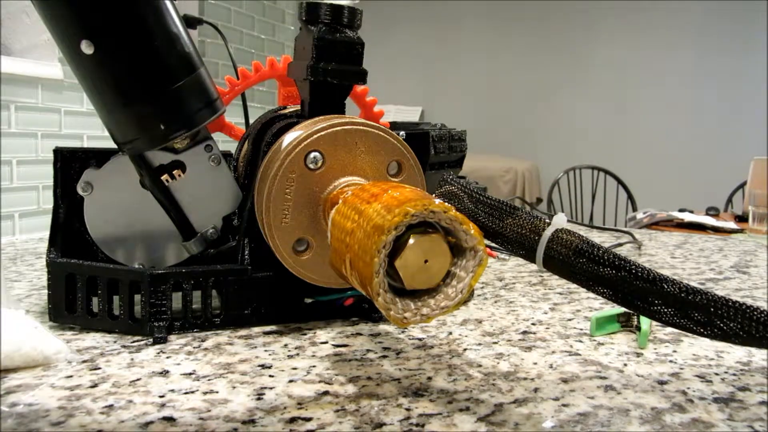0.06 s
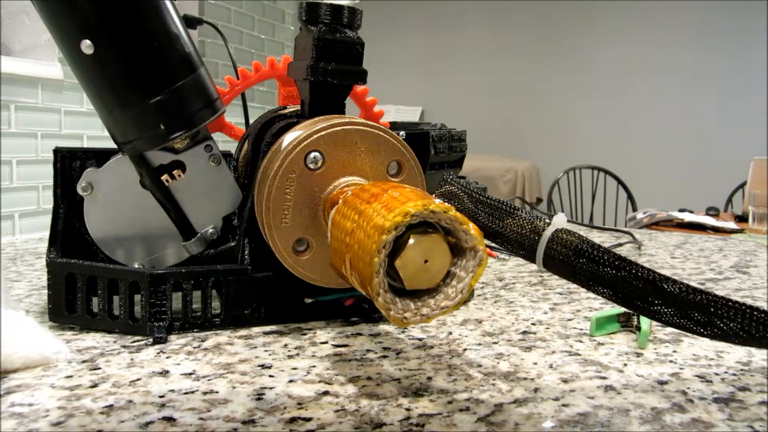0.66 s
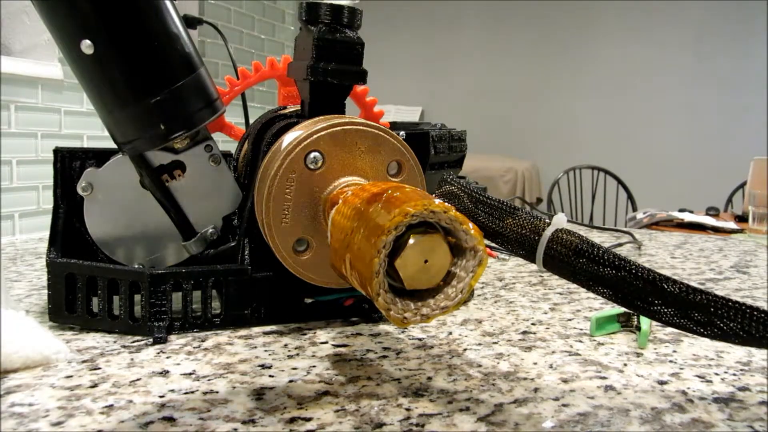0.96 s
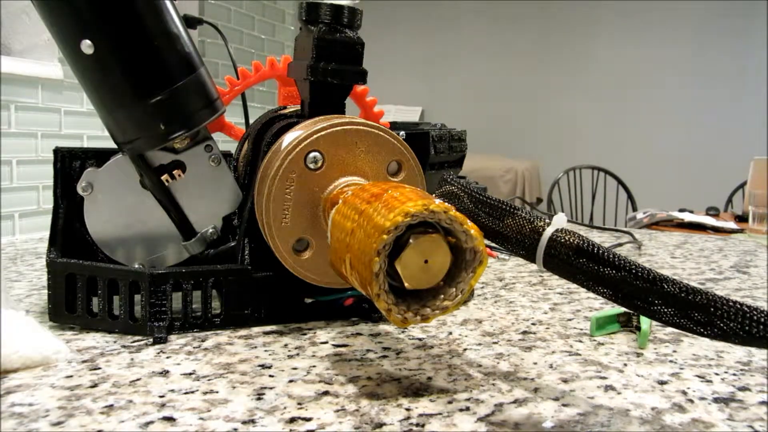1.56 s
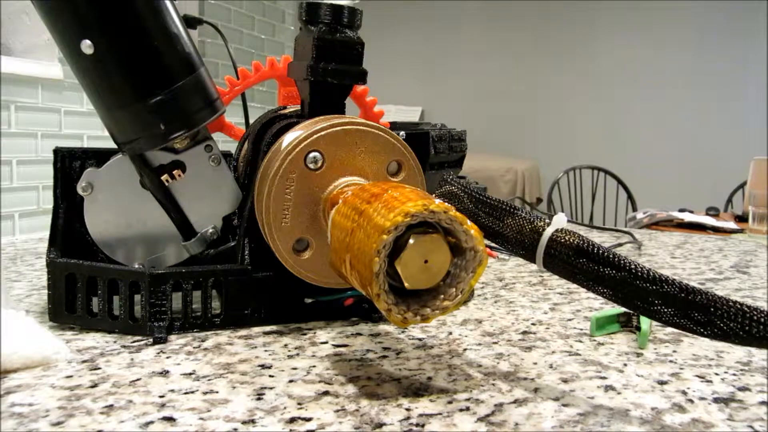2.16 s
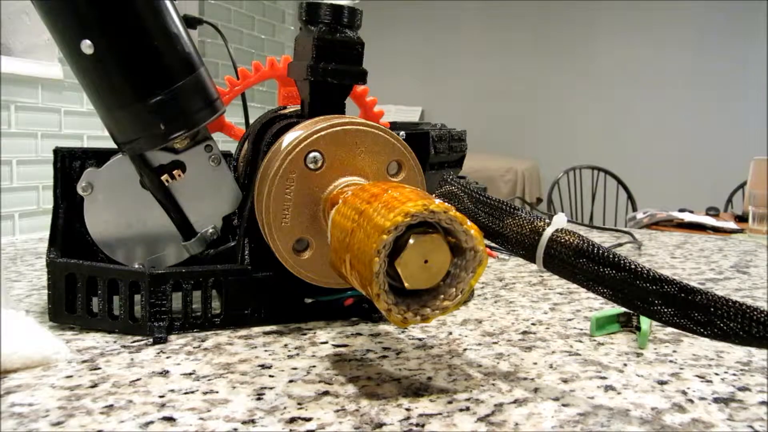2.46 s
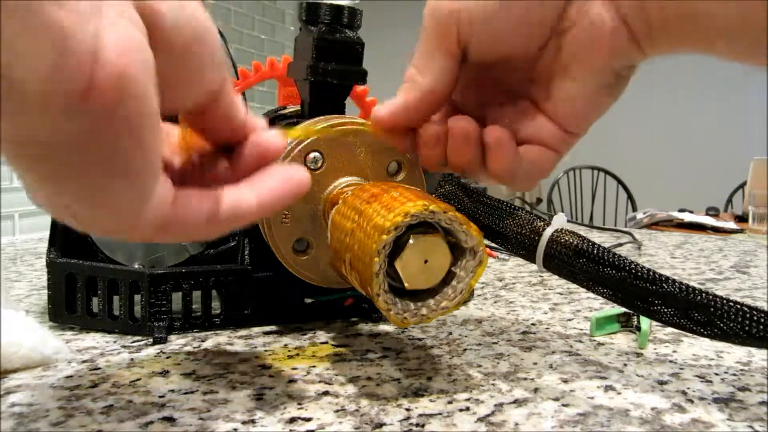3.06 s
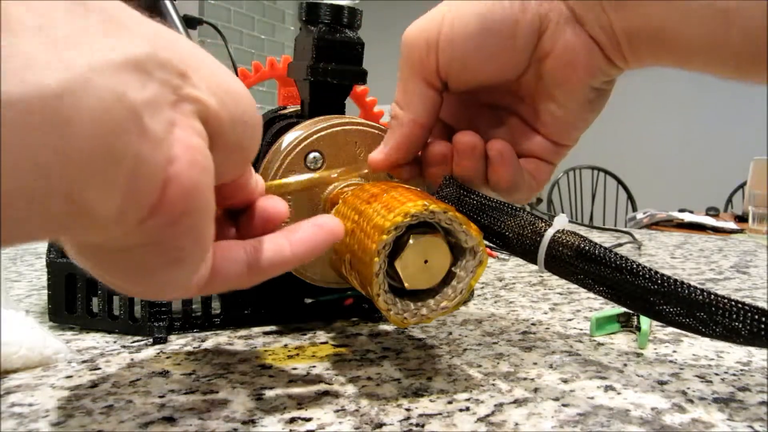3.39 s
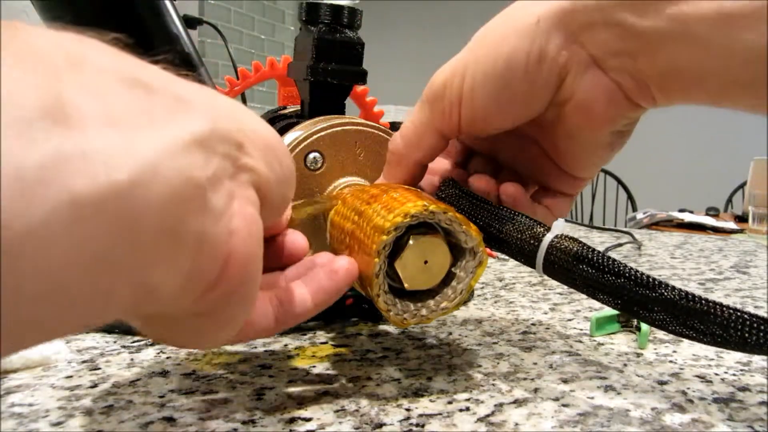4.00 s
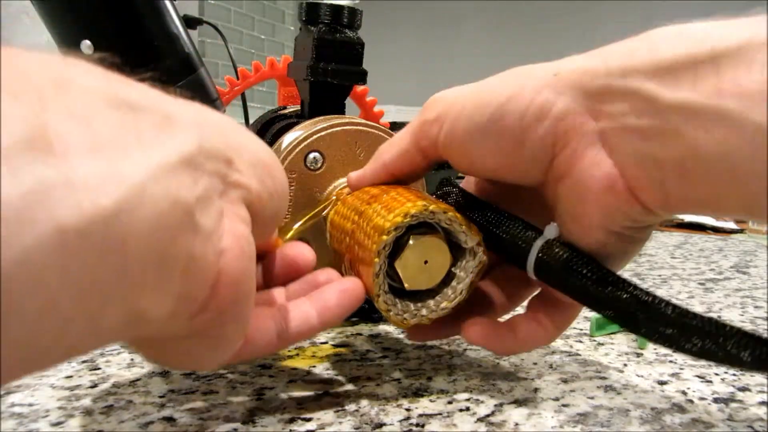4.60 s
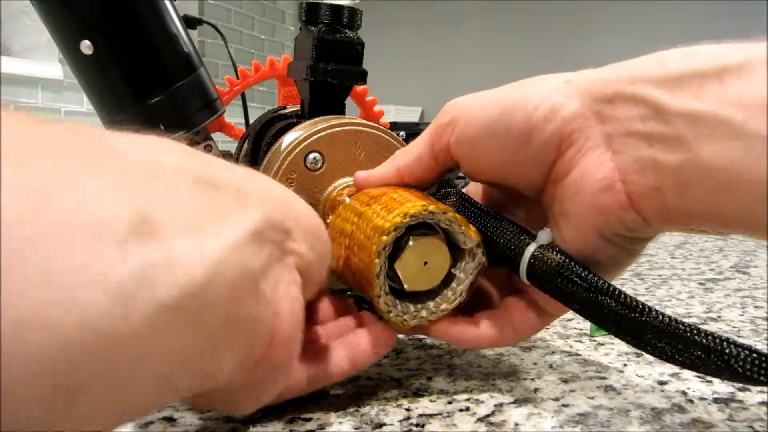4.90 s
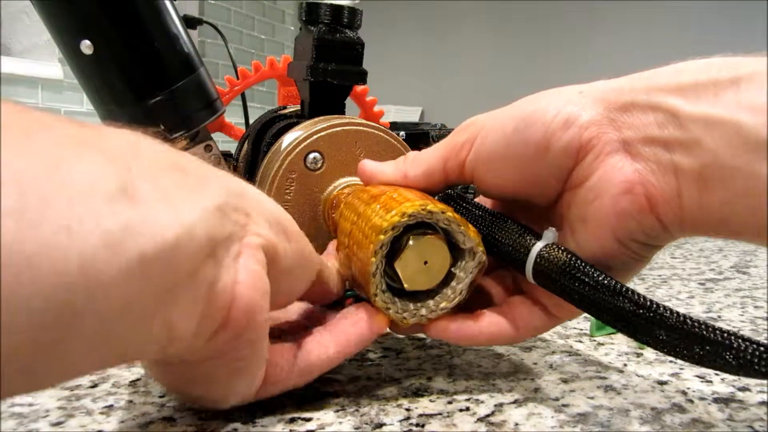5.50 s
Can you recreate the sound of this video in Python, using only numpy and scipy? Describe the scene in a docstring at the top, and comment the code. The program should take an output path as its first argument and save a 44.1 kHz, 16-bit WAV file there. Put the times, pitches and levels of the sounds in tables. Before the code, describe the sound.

Close, hard clacks and a light metal ring sound as a tape roll lands on a countertop and wobbles until it lies flat. Glue then crackles as stiff tape is pulled free, the film buckling in sharp snaps. Things go nearly quiet before fingers wrap the strip around padding, with sparse, softer clicks and faint rubbing. A small kitchen adds a short echo, with a faint electrical hum underneath.

```python
"""In a small kitchen, a roll of stiff film tape is put down on a stone counter with a few knocks
and a thin metal ring, and rocks to rest. A strip is peeled off: glue threads crackle, the film
buckles in snaps. It is pressed around a padded nozzle. The snaps carry a dull, hollow ring.
The walls answer, over faint air noise and mains hum."""
import sys
import numpy as np
from scipy import signal
from scipy.fft import rfft, irfft, next_fast_len
from scipy.io import wavfile
from scipy.ndimage import map_coordinates

SR = 44100
rng = np.random.default_rng(int(sys.argv[2]) if len(sys.argv) > 2 else 0)


def put_to_file(sound):
    """Save the sound as 16-bit audio at rate SR, in the file named by the first command-line argument."""
    columns = np.atleast_2d(sound).T  # one column per channel
    safe = np.clip(columns, -1, 1)
    whole_steps = np.round(safe * 32767)
    wavfile.write(sys.argv[1], SR, whole_steps.astype(np.int16))


N = 249165
TIME_S = np.arange(N) / SR


def amp(db):
    return 10 ** (np.asarray(db) / 20)


def unit_rms(x):
    return x / np.sqrt(np.mean(x ** 2) + 1e-20)


def unit_onset(x, span_s):
    """x with rms 1 over its first span_s."""
    return x / np.sqrt(np.mean(x[:, :int(span_s * SR)] ** 2) + 1e-20)


def along(points, hz):
    """Interpolate (Hz, value) points on a log frequency axis."""
    knots_hz, values = np.transpose(points)
    return np.interp(np.log(hz + 1), np.log(knots_hz + 1), values)


def wobble(rate_hz):
    """Smooth random curve through rate_hz knots a second."""
    knots = rng.standard_normal(int(N * rate_hz / SR) + 4)
    return map_coordinates(knots, [np.arange(N) * rate_hz / SR])


def strokes(rows):
    """Gain per sample from bell curves (centre [s], level [dB], half length [s]), summed in power."""
    bells = (amp(2 * db) * np.exp(-np.minimum(((TIME_S - s) / half_s) ** 2, 60))
             for s, db, half_s in rows)
    return np.sqrt(sum(bells))


def filtered(x, response):
    """Apply the complex gain response(Hz)."""
    n = x.shape[-1]
    padded = 2 * next_fast_len((n + min(n, SR // 4)) // 2 + 1, True)
    return irfft(rfft(x, padded) * response(np.fft.rfftfreq(padded, 1 / SR)), padded)[..., :n]


def lowpass(x, cut_hz, order=4):
    return filtered(x, lambda hz: 1 / (1 + (hz / cut_hz) ** order))


def coloured(x, gain_db):
    """Minimum-phase filter with magnitude gain_db(Hz)."""
    def response(hz):
        cepstrum = irfft(np.log(amp(gain_db(hz))))
        half = len(cepstrum) // 2
        return np.exp(rfft(np.r_[cepstrum[0], 2 * cepstrum[1:half], np.zeros(half)]))
    return filtered(x, response)


def resonated(x, modes):
    """Parallel resonators (centre [Hz], width [Hz], gain [dB]) of alternating sign."""
    def response(hz):
        return sum((-1) ** k * amp(db) * 1j * hz * width / (centre ** 2 - hz ** 2 + 1j * hz * width)
                   for k, (centre, width, db) in enumerate(modes))
    return filtered(x, response)


def stereo(pair, side_db):
    """Mid and side to left and right."""
    mid, side = pair[0], pair[1] * amp(side_db)
    return np.array([mid + side, mid - side])


def noise(side_db, n=N):
    return stereo(rng.standard_normal((2, n)), side_db)


def left_leading(x, lead_s):
    """The left channel arrives lead_s before the right."""
    return filtered(x, lambda hz: np.exp(1j * np.pi * hz * lead_s * np.array([[1], [-1]])))


def add(track, start_s, sound):
    part = track[:, round(start_s * SR):][:, :sound.shape[1]]
    part += sound[:, :part.shape[1]]


def burst(t, t60_s, front_db, front_t60_s, side_db):
    """A hard front, then dense flexural ringing."""
    return noise(side_db, len(t)) * (amp(-60 * t / t60_s) + amp(front_db - 60 * t / front_t60_s))


def shell_spot(note_hz, note_db, width_oct, ripple_db=2.5):
    """Gain curve [dB] of one spot on a thin shell: a leading note among uneven lesser ones."""
    ripple = ripple_db * rng.standard_normal(128)

    def gain_db(hz):
        leading = note_db / (1 + (np.log2((hz + 1) / note_hz) / width_oct) ** 2)
        return leading + np.interp(8 * np.log2(hz + 1), np.arange(len(ripple)), ripple)
    return gain_db


def sliding(gain, modes, rough_db, cut_hz):
    """Uneven friction excites a body's modes; soft contact has little treble."""
    friction = noise(side_db=-12.5) * amp(rough_db * wobble(110))
    return gain * unit_rms(resonated(lowpass(friction, cut_hz), modes))


# Air noise spectrum: (frequency [Hz], gain [dB])
AIR_SPECTRUM = [(15, -43), (25, -12.5), (122, -9.5), (360, -7), (552, -13), (666, -10), (1410, -15.5),
                (7700, -21.5), (14500, -28.5), (16500, -50)]
# Air noise width: (frequency [Hz], side re mid [dB])
AIR_WIDTH = [(60, 6.5), (380, 9.5), (2380, 12), (15000, 0)]


def background(air_mid_db=-57.5, hum_hz=120, tone_hz=15735):
    """Still room air and mains hum, plus a very faint, steady 15.7 kHz tone."""
    def mid_side_gain(hz):
        return amp(along(AIR_SPECTRUM, hz)) * [np.ones_like(hz), amp(along(AIR_WIDTH, hz))]
    mid_side = filtered(rng.standard_normal((2, N)), mid_side_gain)
    air = amp(air_mid_db) * stereo(mid_side, 0) / np.std(mid_side[0])
    hum = amp([[-69], [-63]]) * np.sin(2 * np.pi * hum_hz * TIME_S)
    tone = amp(-74) * np.sin(2 * np.pi * tone_hz * TIME_S)
    return air + hum + tone


# Room decay: (frequency [Hz], t60 [s])
KITCHEN_DECAY = [(150, 0.72), (1000, 0.49), (7000, 0.41), (15000, 0.3)]


def kitchen(x, build_up_s=0.00025, paths=4, drift_hz=45, low_cut_hz=130):
    """Wall reflections, treble dying first; a drifting mix of tails gives each blow other paths."""
    shares = np.array([wobble(drift_hz) for _ in range(paths)])
    shares /= np.linalg.norm(shares, axis=0)
    out = np.zeros((2, N))
    for share in shares:
        hz, t, spectra = signal.stft(noise(side_db=-11, n=SR // 2), SR, nperseg=256)
        decay = amp(-60 * t / along(KITCHEN_DECAY, hz)[:, None])
        tail = signal.istft(spectra * decay, SR, nperseg=256)[1]
        tail *= 1 - np.exp(-np.arange(tail.shape[1]) / SR / build_up_s)
        tail /= np.linalg.norm(tail[0])
        out += signal.fftconvolve((share * x.mean(0))[None], tail, axes=1)[:, :N]
    return out - lowpass(out, low_cut_hz)


def hand_bump():
    """A firm press of the hand sends a low bump through the counter."""
    rumble = resonated(noise(side_db=-2.3), [(69, 54, 0)])
    return strokes([(5.565, -53.5, 0.045)]) * unit_rms(lowpass(rumble, cut_hz=150, order=2))


# Blows on the metal: (time [s], level [dB])
METAL_BLOWS = [(0.379, -29.5), (1.2233, -41.5)]
# Metal resonances: (centre [Hz], width [Hz], gain [dB])
METAL_MODES = [(2370, 360, -7), (5660, 290, 1.5), (6020, 190, 3.5), (8160, 120, -4)]


def metal_clinks():
    """A light metal part clinks, then shimmers on in clusters of close modes."""
    out, t = np.zeros((2, N)), np.arange(SR // 2) / SR
    for s, db in METAL_BLOWS:
        shimmer = burst(t, t60_s=0.42, front_db=6, front_t60_s=0.083, side_db=-28)
        add(out, s, amp(db) * unit_onset(resonated(shimmer, METAL_MODES), span_s=0.036))
    return out


def rocking(turns=7, start_s=0.958, gap_s=0.064, gap_ratio=0.878, first_db=-41, step_db=1.07):
    """Gain per sample: one stroke of the rim per turn, sooner and stronger until the roll lies flat."""
    half_s = 0.013
    times_s = start_s + np.r_[0, np.cumsum(gap_s * gap_ratio ** np.arange(turns - 1))]
    return strokes([(s, first_db + step_db * turn, half_s) for turn, s in enumerate(times_s)])


# Resonances of the dragged roll: (centre [Hz], width [Hz], gain [dB])
ROLL_MODES = [(164, 31, -12), (348, 51, -7), (830, 230, -6.5), (1257, 106, 1), (1630, 240, -11.5),
              (2090, 130, -7), (3660, 1700, -15)]
# Skids on the stone: (time [s], level [dB], half length [s])
ROLL_SKIDS = [(.504, -25, 0.0062)]


def roll(rattle_db=-6.5):
    """The roll skids, then rocks with a hollow scrape; the harder turns also stir the metal."""
    turns = rocking()
    skid = sliding(strokes(ROLL_SKIDS), ROLL_MODES, rough_db=5, cut_hz=4500)
    rim = sliding(turns, ROLL_MODES, rough_db=3, cut_hz=4500)
    rattle = sliding(amp(rattle_db) * turns ** 2 / turns.max(), METAL_MODES, rough_db=3.5, cut_hz=11000)
    return skid + rim + rattle


# Hard contacts: (time [s], relative level [dB], tilt [dB/oct], thud trim [dB], t60 [s], note [Hz])
CONTACTS = [(0.2204, -33.5, -4, -17, 0.044, 5400), (0.2357, -36.5, -2.5, -5.5, 0.12, 3100),
            (0.379, -16, -4, -1.5, 0.028, 776), (0.395, -28.5, -4, -8, 0.02, 2580),
            (0.5104, -16.5, -3.5, -14, 0.044, 1100), (0.615, -32.5, -3, -30, 0.051, 3780),
            (0.7766, -16.5, 0.5, -12.5, 0.018, 3130), (0.8013, -15.5, -1.5, -13, 0.023, 2370),
            (0.8119, -20.5, -2.5, -8.5, 0.047, 4060), (0.834, -22.5, 1.5, -5.5, 0.054, 3200),
            (0.857, -32.5, -6, 0.5, 0.23, 980), (1.2256, -27.5, -4, -19, 0.02, 8000),
            (1.245, -34, -11, -13, .04, 1300)]
# Contact spectrum: (frequency [Hz], gain [dB])
CLACK_SPECTRUM = [(80, -35), (300, -7), (700, -5), (1200, 4), (3200, 3), (5500, 6.5), (8200, 5),
                  (11000, 0.5), (16000, -9)]
# Spectrum of the shaken roll and counter: (frequency [Hz], gain [dB])
THUD_SPECTRUM = [(40, -15), (150, -5.5), (330, 4.5), (520, -9), (780, 5.5), (950, -6), (1400, 2),
                 (2500, -56)]


def knocks(onset_s=0.01):
    """Hard contacts clack and shake the roll and the counter."""
    out, t = np.zeros((2, N)), np.arange(SR // 8) / SR
    for s, db, tilt_db_oct, thud_db, t60_s, note_hz in CONTACTS:
        spot_db = shell_spot(note_hz, note_db=8, width_oct=0.1)

        def clack_db(hz):
            treble_oct = np.log2(np.clip(hz, 2000, 12000) / 2000)
            return along(CLACK_SPECTRUM, hz) + spot_db(hz) + tilt_db_oct * treble_oct
        clack = coloured(burst(t, t60_s, front_db=-25, front_t60_s=0.0029, side_db=-7.5), clack_db)
        thud = burst(t, t60_s=0.075, front_db=-19, front_t60_s=0.004, side_db=-12)
        thud = coloured(thud, lambda hz: along(THUD_SPECTRUM, hz)) * amp([[-2.4], [2.4]])
        add(out, s, amp(db - 0.55) * unit_onset(clack, onset_s))
        add(out, s, amp(db + thud_db - 3.5) * unit_onset(thud, onset_s))
    return out


def strip_swish():
    """The free end of the strip slides up with a faint swish as the peel begins."""
    return sliding(strokes([(1.69, -56, 0.14)]), [(6060, 3500, 0)], rough_db=1.5, cut_hz=14000)


# Creaks of the strip: (time [s], level [dB], half length [s])
STRIP_CREAKS = [(3.31, -56.5, 0.026), (3.5, -55, 0.064), (3.7, -47.5, 0.0045)]


def strip_creaks():
    """Drawn taut between the hands, the strip creaks on one narrow note."""
    return sliding(strokes(STRIP_CREAKS), [(1297, 33, 0)], rough_db=3, cut_hz=2510)


def pull_gain(curve):
    """Gain per sample of a pull on the strip; slack before and after."""
    return amp(np.interp(TIME_S, *np.transpose(curve), left=-120, right=-120))


# Crackle spectrum of the film: (frequency [Hz], gain [dB])
FILM_SPECTRUM = [(100, -30), (300, -2.5), (800, -10), (1250, -1.5), (5500, 2.5), (8200, 1.5), (10500, -4.5),
                 (16000, -11.5)]


def crackle(pull, rate_hz, scatter_db, hiss_power, full_pull_db=-35, tick_t60_s=0.0035):
    """Glue threads break in tiny ticks over a soft hiss, louder and denser with more pull."""
    density_hz = rate_hz * np.sqrt(pull / amp(full_pull_db) + 1e-6)
    sizes = amp(scatter_db * np.minimum(rng.standard_normal(N), 1.5)) * pull / np.sqrt(density_hz)
    ticks = (rng.random(N) < density_hz / SR) * sizes
    decay = amp(-60 * TIME_S[:SR // 100] / tick_t60_s)
    power = np.abs(signal.fftconvolve(ticks ** 2, decay ** 2)[:N])
    envelope = np.sqrt(power / power.mean() + hiss_power * unit_rms(pull) ** 2)
    grains = coloured(noise(side_db=-5.5) * envelope, lambda hz: along(FILM_SPECTRUM, hz))
    return np.sqrt(np.mean(pull ** 2)) * unit_rms(grains)


# Pull while peeling, then wrapping, as crackle level: (time [s], level [dB])
PEEL_PULL = [(1.70, -65), (1.79, -43.5), (1.94, -41.5), (2.08, -43.5), (2.22, -48), (2.33, -78),
             (2.54, -50), (2.72, -65)]
WRAP_PULL = [(3.62, -63), (3.73, -53), (3.84, -52), (4.07, -60.5), (4.3, -52.5), (5.03, -50.5),
             (5.14, -53.5), (5.5, -50)]
# Sudden tugs on the glue: (time [s], level [dB], half length [s])
GLUE_TUGS = [(.185, -45, 0.0088), (1.5, -49.5, 0.016), (.32, -32.5, 0.041), (1.771, -34, 0.019),
             (2.258, -38, 0.014), (2.361, -25, 0.0034), (2.676, -43, 0.0093), (3.078, -38, 0.011),
             (4.468, -41, 0.017), (4.892, -42.5, 0.017), (5.521, -38, 0.023)]


def glue(catch_db=3, catch_hz=40):
    """Peeling tears the glue in sharp, uneven catches; wrapping only stirs it faintly."""
    tearing = np.hypot(pull_gain(PEEL_PULL) * amp(catch_db * wobble(catch_hz)), strokes(GLUE_TUGS))
    peeling = crackle(tearing, rate_hz=1300, scatter_db=8, hiss_power=0.14)
    stirring = pull_gain(WRAP_PULL) * amp(catch_db * wobble(catch_hz))
    return peeling + crackle(stirring, rate_hz=260, scatter_db=5, hiss_power=0.55)


# Resonances of the rubbed body: (centre [Hz], width [Hz], gain [dB])
RUBBED_MODES = [(867, 260, -4), (1400, 250, 1.5), (2400, 640, 0.5), (3650, 730, -2)]
# Slips on the wrap: (time [s], level [dB], half length [s])
FINGER_SLIPS = [(4.685, -44, 0.011), (4.897, -42, 0.018)]


def finger_rub(rub_db=-57.5, ref_pull_db=-52, growth_db_per_db=0.11):
    """Finger friction grows with the pull, with brief slips on top."""
    pull = (pull_gain(PEEL_PULL) + pull_gain(WRAP_PULL)) / amp(ref_pull_db)
    gain = np.hypot(amp(rub_db) * pull ** growth_db_per_db, strokes(FINGER_SLIPS))
    return sliding(gain, RUBBED_MODES, rough_db=1.5, cut_hz=2000)


# Hollow note, rising as the fingers close round the wrap: (time [s], pitch [Hz])
HOLLOW_PITCH = [(4.9, 1290), (5.2, 1478)]
# Its modes: (frequency [multiple of the note], relative level [dB], t60 [s])
HOLLOW_MODES = [(1, 21, 0.044), (1.17, 18, 0.018), (1.67, 13, 0.028)]


def hollow_ring(start_s, t, detune=0.035, spread_rad=0.23, low_cut_hz=850):
    """Damped modes, varied per snap and between the ears; so small a body radiates almost no bass."""
    note_hz = np.interp(start_s, *np.transpose(HOLLOW_PITCH))
    multiple, db, t60_s = np.transpose(HOLLOW_MODES)[:, :, None]
    pitch, size, lag = rng.standard_normal((3, len(HOLLOW_MODES), 1))
    phase = 2 * np.pi * note_hz * multiple * (1 + detune * pitch) * t
    decay = amp(db + 2 * size - 60 * t / t60_s)
    ring = np.array([(decay * np.sin(phase + ear * spread_rad * lag)).sum(0) for ear in (-1, 1)])
    return filtered(ring, lambda hz: (1j * hz / (low_cut_hz + 1j * hz)) ** 3)


def small_snaps(candidates=400, full_pull_db=-41, over_db=3, scatter_db=3.5, ring_db=-9, thinning=2.7):
    """Random rows like SNAPS for the peel, more frequent and louder as the pull grows."""
    when, chance = rng.random((candidates, 2)).T
    size, pitch = np.clip(rng.standard_normal((candidates, 2)), -2, 2).T
    sample = (when * (N - 1)).astype(int)
    pull = pull_gain(PEEL_PULL)[sample]
    level_db = 20 * np.log10(pull) + over_db + scatter_db * size
    facet_hz = 5800 * 2 ** (0.25 * pitch)
    rows = np.c_[sample / SR, level_db, facet_hz, np.full(candidates, ring_db)]
    return list(rows[chance < (pull / amp(full_pull_db)) ** thinning])


# Sharp ticks: the film buckles or the glue lets go; a few near 1.1 s are the rim of the rocking roll ticking on
# the stone: (time [s], relative level [dB], facet pitch [Hz], ring trim [dB])
SNAPS = [(0.273, -25.5, 9100, -35), (0.325, -25, 5650, -29), (0.3513, -26.5, 7850, -9),
         (1.0028, -37.5, 4860, -2), (1.077, -35, 4700, -22), (1.118, -45, 5340, -6),
         (1.165, -38, 4440, 8.5), (1.1943, -33, 5230, -4), (1.2016, -26.5, 5550, -7),
         (1.7705, -24, 5950, -12.5), (1.8375, -34.5, 4530, 1.5), (1.868, -33.5, 5600, -9),
         (1.924, -37, 5770, 0), (1.9936, -37, 4730, -11), (2.0152, -25, 4830, -29),
         (2.0273, -32.5, 4300, -10), (2.04, -23, 5850, -15.5), (2.0649, -29.5, 6970, -26),
         (2.0734, -32, 5650, -6), (2.1044, -24.5, 6500, -4), (2.112, -36, 3850, 0),
         (2.125, -36, 5000, 0), (2.1397, -22.5, 8530, -27), (2.208, -36.5, 7300, -0.5),
         (2.2265, -21.5, 4560, -2.5), (2.2449, -19.5, 3940, -12), (2.256, -35, 6500, -4),
         (2.2741, -20, 7000, -13), (2.3559, -29.5, 4440, -5), (2.438, -23.5, 7600, -8),
         (2.4454, -31, 2280, -1), (2.739, -28, 8000, -23), (2.7774, -28, 6250, -4),
         (2.781, -21, 6700, -15), (2.8105, -35.5, 6500, -12), (3.014, -46.5, 5900, -16),
         (3.069, -39.5, 3700, 1), (3.7756, -34, 4140, -6), (3.856, -33, 3140, 0.5),
         (3.8996, -33, 5420, 4), (4.0008, -40, 7600, -18), (4.2585, -29.5, 3180, -4),
         (4.3852, -34.5, 4700, -28), (4.4307, -34.5, 2240, -10), (4.477, -28.5, 3600, -5),
         (4.4835, -28.5, 3760, -11), (4.734, -42.5, 9000, -23), (4.803, -34, 2410, -2.5),
         (4.8706, -35, 4060, -3), (4.8839, -37, 7000, -7), (4.91, -43, 2330, -2),
         (4.928, -43.5, 2430, 11.5), (4.9878, -44, 2490, 5.5), (5.0277, -34.5, 2450, -10),
         (5.04, -36, 4250, -4), (5.0599, -40, 6000, -6.5), (5.0883, -37, 8900, -7),
         (5.1974, -39.5, 5020, -13), (5.206, -30.5, 6950, -2.5), (5.235, -35, 8100, -27),
         (5.297, -40.5, 5100, -4), (5.327, -38.5, 2820, 11.5), (5.3995, -40.5, 5310, -4),
         (5.4103, -36.5, 5030, -4.5), (5.438, -40.5, 2860, -20), (5.4907, -39, 2830, -12),
         (5.5172, -20, 12300, -16), (5.5171, -25.5, 3180, -13), (5.6365, -27.5, 4100, -1)]
# Tick spectrum: (frequency [Hz], gain [dB])
TICK_SPECTRUM = [(60, -53), (400, 1), (900, -5), (2300, 3), (3500, 0.5), (8200, 3.5), (10500, 0),
                 (16000, -3)]


def snaps(slope_db_oct=4.5, wander_s=14e-6, on_roll_until_s=2.9, shake_db=-25.5, onset_s=0.005):
    """A facet flips and ticks over a hollow ring, shaking the roll while the strip hangs on it."""
    out, t = np.zeros((2, N)), np.arange(SR // 16) / SR
    for s, db, facet_hz, ring_db in SNAPS + small_snaps():
        spot_db = shell_spot(facet_hz, note_db=4.5, width_oct=0.18)

        def facet_db(hz):
            distance_oct = np.abs(np.log2((hz + 1) / facet_hz))
            return along(TICK_SPECTRUM, hz) - slope_db_oct * distance_oct + spot_db(hz)
        tick = coloured(burst(t, t60_s=0.028, front_db=15, front_t60_s=0.0018, side_db=-18), facet_db)
        tick = left_leading(tick, wander_s * rng.standard_normal())  # another spot on the strip
        add(out, s, amp(db + 2) * unit_onset(tick, onset_s))
        add(out, s, amp(db + ring_db - 3.5) * unit_onset(hollow_ring(s, t), onset_s))
        shake = burst(t, t60_s=0.025, front_db=-14, front_t60_s=0.0027, side_db=-14)
        shake = coloured(shake, lambda hz: along(THUD_SPECTRUM, hz))
        if s < on_roll_until_s:
            add(out, s, amp(db + shake_db) * unit_onset(shake, onset_s))
    return out


def scene():
    """The roll on the counter and the strip in the hands, both answered by the kitchen."""
    counter = left_leading(knocks() + metal_clinks() + roll(), lead_s=20e-6)
    tape = (snaps() + glue() + strip_swish() + strip_creaks() + finger_rub()) * amp([[-0.4], [0.4]])
    room = kitchen(amp(-10.5) * counter + amp(-16.5) * tape)
    return counter + tape + hand_bump() + room + background()


def record(dry):
    """Steep band limit."""
    top_hz = 16200
    return filtered(dry, lambda hz: 1 / np.sqrt(1 + (hz / top_hz) ** 120))


dry = scene()
out = record(dry)
put_to_file(out)
```